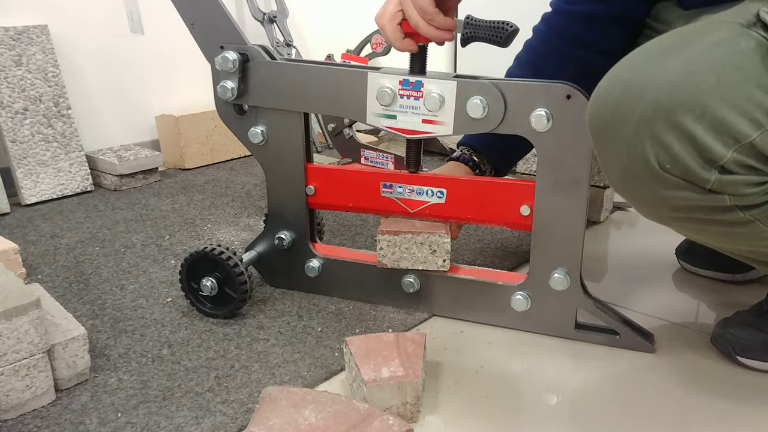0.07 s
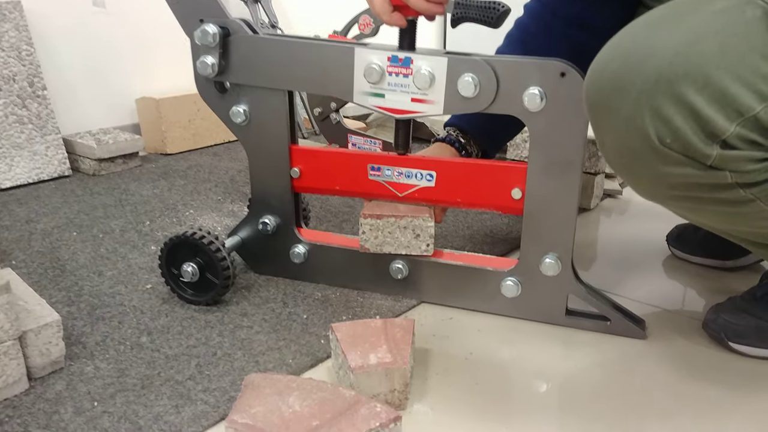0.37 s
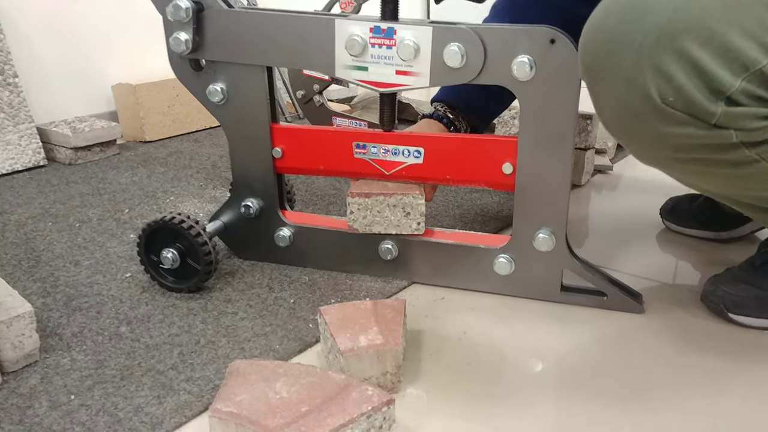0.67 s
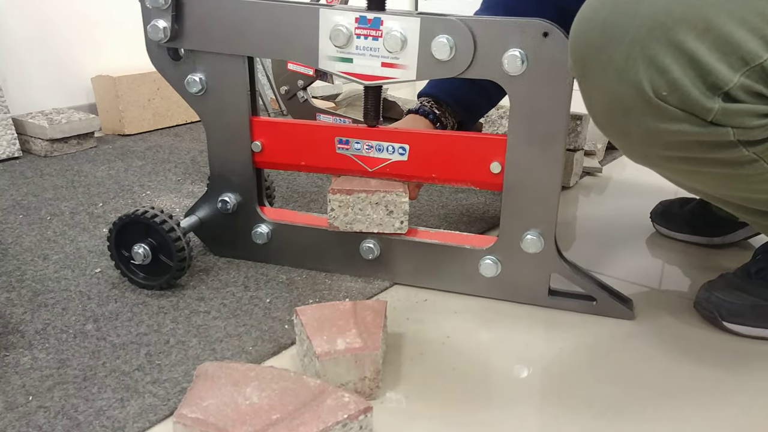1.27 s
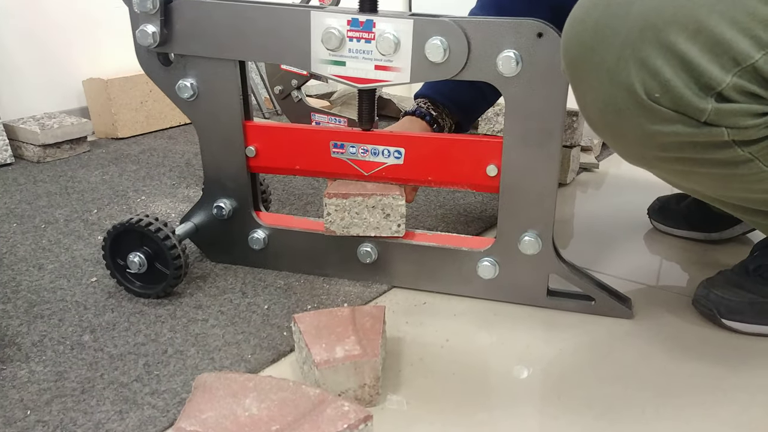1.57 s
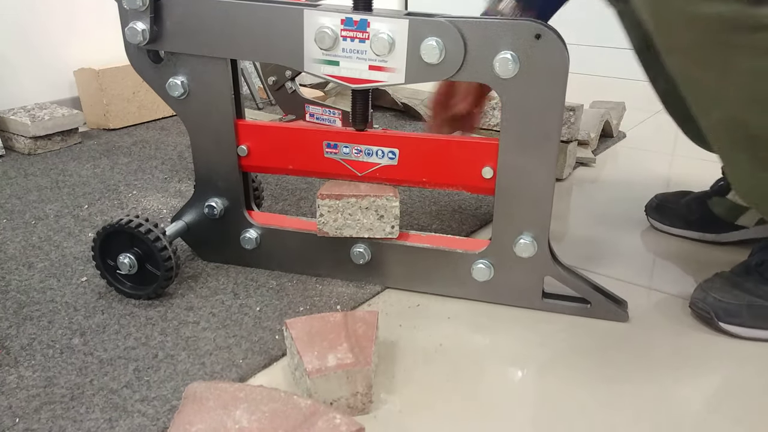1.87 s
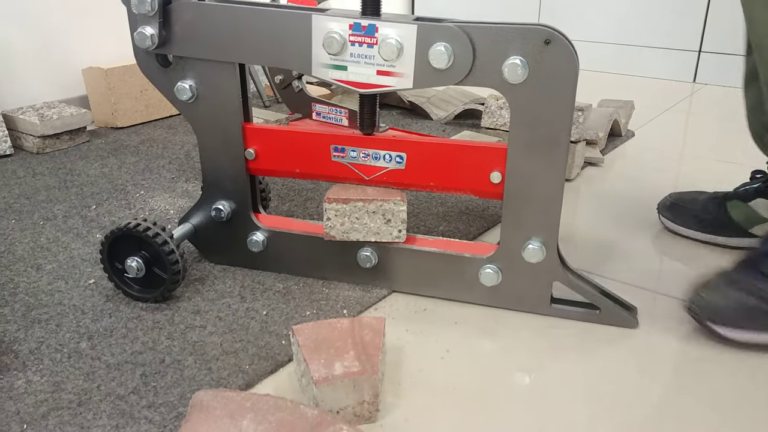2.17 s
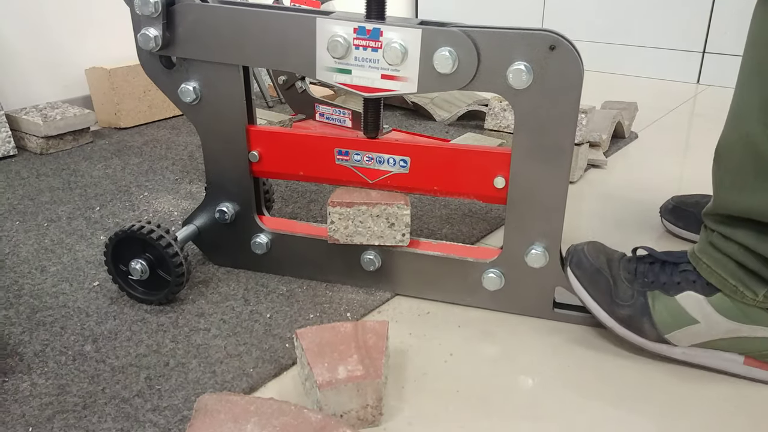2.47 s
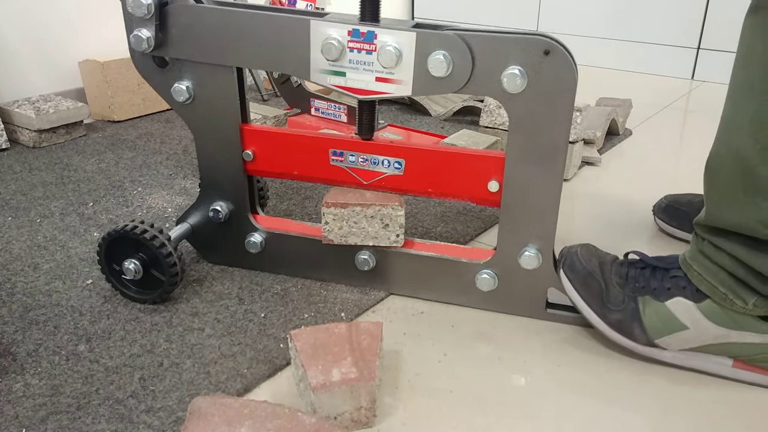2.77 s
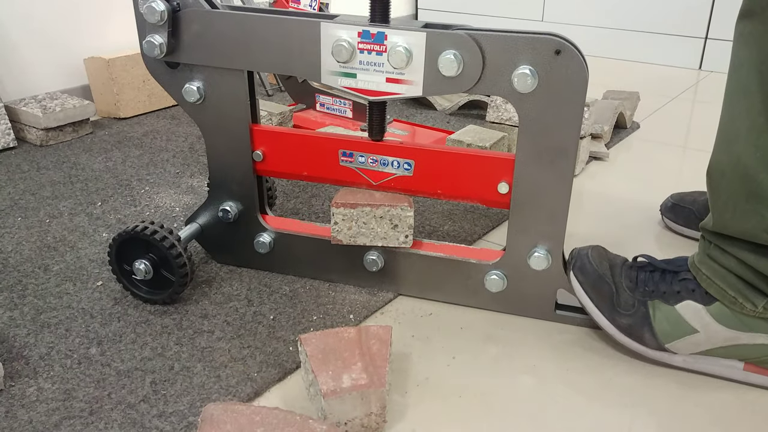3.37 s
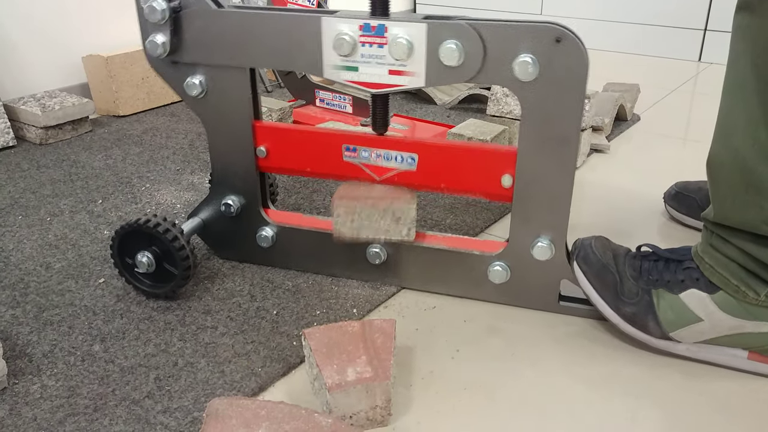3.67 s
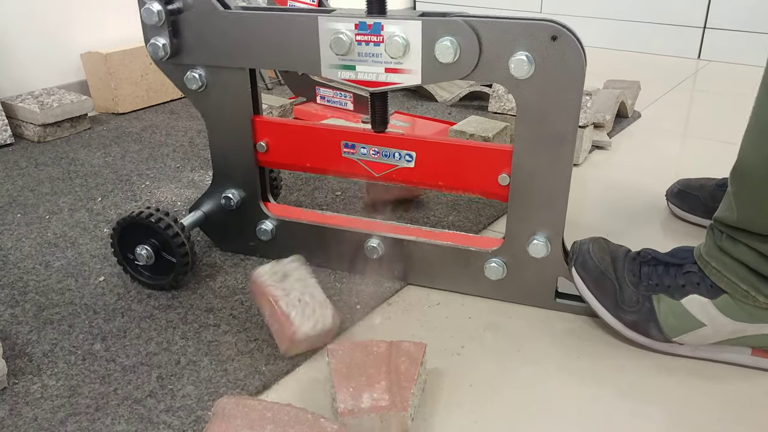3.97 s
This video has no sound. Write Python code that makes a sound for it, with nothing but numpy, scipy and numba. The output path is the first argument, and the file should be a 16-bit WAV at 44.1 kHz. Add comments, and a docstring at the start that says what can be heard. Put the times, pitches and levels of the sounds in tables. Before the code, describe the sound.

A paving block splits with a loud crack in a steel lever cutter. First come faint scraping, a shoe's stamp, creaking and crunching; then the halves clatter against the frame, close by in a hard-floored room.

```python
"""Cutting a paving block

A lever block cutter in a hard-floored showroom, about a metre from a stereo microphone, a little right.
The blade screw is turned, a block is slid into place and a shoe stamps on the frame's foot.
The lever creaks, the blade crunches in, the block snaps and its halves tumble against the steel.
The recorder's limiter flattens the bang."""
import sys
import numpy as np
from scipy import signal
from scipy.fft import rfft, irfft
from scipy.io import wavfile
from scipy.ndimage import uniform_filter1d
from numba import njit

SR = 44100
rng = np.random.default_rng(int(sys.argv[2]) if len(sys.argv) > 2 else 0)


def master_out(mix):
    """Clip the mix to full scale and print it as 16-bit PCM to the path in sys.argv[1]."""
    frames = np.transpose(np.atleast_2d(mix))
    ceiling = np.clip(frames, -1, 1)
    pcm = np.round(ceiling * 32767).astype(np.int16)
    wavfile.write(sys.argv[1], SR, pcm)


N = 176400
TIME = np.arange(N) / SR
WIDE_ABOVE_HZ, STEREO_WIDTH = 930, 0.83


# the break, the dropping blade and the tumbling halves:
# (time [s], stone crack [dB], its decay [s], clank [dB], floor thud [dB])
BLOWS = [(3.6613, 1, 0.061, -8, -20), (3.688, -1.5, 0.055, -1.5, -3.5), (3.729, -6, 0.0087, -6.5, -19),
         (3.743, -11.5, 0.014, -9, -3), (3.777, -8, 0.026, 5, -9.5), (3.803, -8.5, 0.01, -3, -20),
         (3.819, 10.5, 0.0026, 1.5, -9.5), (3.826, -19, 0.0046, -12, 3), (3.836, -9, 0.0015, -9, -11),
         (3.924, -34, 0.058, -26, -9.5)]
# tone of bursting stone and of struck steel: (frequency [Hz], gain [dB])
STONE_COLOUR = [(180, -17), (350, -3), (600, -8), (1200, -6.5), (2250, -1), (2600, -10.5), (3500, -4),
                (5500, -8.5), (7600, -10.5), (9000, -24), (11000, -41.5), (15000, -25)]
CLANK_COLOUR = [(80, -28), (160, -0.5), (330, 2), (500, -3.5), (900, 0), (1500, -5.5), (2200, -9.5),
                (4000, -25), (12000, -50)]
# ringing of the steel frame: (frequency [Hz], gain [dB])
FRAME_MODES = [(253, 7), (346, 3.5), (585, 2.5), (816, -1), (1150, -1), (1828, -2.5), (1934, -6),
               (2021, -3), (2292, -12), (2337, -4.5), (3603, -13.5), (4395, -14)]
# hollow pop of the parting block; boom of the frame on the floor: (frequency [Hz], width [Hz], gain [dB])
POP_MODES = [(1280, 250, 0)]
BOOM_MODES = [(67.4, 3.1, 4), (93.5, 6.3, 3.5), (114, 7.7, -2.5), (165, 17, -6.5), (253, 21, -3),
              (344, 33, -3.5)]

def snap(clank_s=0.012, thud_s=0.0017, pop_s=0.0013, ring_t60_s=0.3, ring_db=-22.5):
    """The block bursts; blade and halves strike the frame, which rings and booms on the floor."""
    bursts = sum(undb(db) * decay(s, length) for s, db, length, _, _ in BLOWS)
    stone = grit(per_s=870, spread_db=-0.5, grain_s=0.0052) * bursts
    strikes = [(s, db) for s, _, _, db, _ in BLOWS]
    clank = noise() * hits(strikes, clank_s)
    thuds = np.ones((2, 1)) * hits([(s, db) for s, _, _, _, db in BLOWS], thud_s)
    energy = sum((undb(db) * decay(s, ring_t60_s / np.log(1000))) ** 2 for s, db in strikes)
    ring = np.sqrt(energy) * sum(undb(db + ring_db) * beating(hz) for hz, db in FRAME_MODES)
    pop = resonate(noise() * undb(7) * decay(BLOWS[0][0], pop_s), POP_MODES)
    crack = pan(colour(stone, STONE_COLOUR), db=-1.3)
    boom = pan(resonate(thuds, BOOM_MODES), db=4)
    return crack + pop + colour(clank, CLANK_COLOUR) + ring + boom


# the blade crushing the block's surface: (time [s], level [dB])
CRUNCH = [(3.15, -55.5), (3.162, -39.5), (3.24, -31.5), (3.30, -33), (3.35, -41.5), (3.44, -54),
          (3.51, -36.5), (3.59, -45), (3.655, -39.5)]
# small fractures before the break: (time [s], level [dB], jolt [dB])
CRACKS = [(3.1567, -33.5, -66), (3.235, -16.5, -46), (3.3614, -10.5, -35), (3.4189, -16, -35),
          (3.4426, -14, -40), (3.472, -20.5, -71), (3.5278, -27, -67), (3.604, -25, -66),
          (3.654, -17.5, -72)]
# tone of the crushed grains: (frequency [Hz], gain [dB])
CRUNCH_COLOUR = [(100, -6.5), (800, -29), (1200, -13), (1500, -2.5), (2300, -7.5), (3100, -17), (3950, 3.5),
                 (4700, -3), (7400, -1), (8000, -13), (9200, -10.5), (10800, -43), (15500, -13)]
# ringing of the blade: (frequency [Hz], width [Hz], gain [dB])
BLADE_MODES = [(3993, 120, 6.5), (5520, 85, -1), (6330, 120, 2), (7260, 93, 4)]

def blade(crack_s=0.0042, jolt_s=0.021):
    """Grains crush under the edge and small fractures ring the blade and jolt the frame."""
    crush = grit(per_s=400, spread_db=4.5, grain_s=0.0031) * curve(CRUNCH)
    cracks = noise() * hits([(s, db) for s, db, _ in CRACKS], crack_s)
    ring = undb(-4.5) * resonate(cracks + undb(-7.5) * crush, BLADE_MODES)
    jolts = noise() * hits([(s, db) for s, _, db in CRACKS], jolt_s)
    thumps = resonate(jolts, [(133, 130, 5.8), (280, 170, 8)])
    return undb(-0.5) * colour(crush + cracks, CRUNCH_COLOUR) + ring + thumps


# creak of the lever under load: (time [s], level [dB])
CREAK = [(2.6, -62), (2.612, -44), (2.66, -39), (2.74, -39.5), (2.81, -30.5), (2.88, -39), (2.95, -34.5),
         (3.05, -47.5), (3.13, -53.5)]
# tone of the creak: (frequency [Hz], gain [dB])
CREAK_COLOUR = [(200, -5), (400, -18.5), (1000, -23), (1550, 1), (2000, -11), (2900, -8), (4400, 2),
                (5200, 0), (6100, -12), (7400, -14), (9200, -17.5), (10800, -66), (14500, -20)]
# slips of the lever joint: (time [s], level [dB], knock of the frame [dB])
SLIPS = [(2.61, -30.5, -34.5), (2.633, -49, -22.5), (2.648, -22, -23.5), (2.758, -25, -50),
         (2.7807, -24, -36), (2.798, -31.5, -29), (2.821, -25.5, -37), (2.832, -22.5, -42),
         (2.8603, -21, -47), (2.906, -16.5, -30.5), (2.9191, -3.5, -10.5), (3.102, -36.5, -54)]
# rasp of the joint, rising as the load builds: (time [s], level [dB], centre [Hz])
RASP = [(2.61, -50, 3600), (2.68, -42, 3780), (2.75, -45.5, 4250), (2.83, -39, 4600), (2.93, -41, 4700)]
# the joint's ring, its first squeak, the knock of lever and frame: (frequency [Hz], width [Hz], gain [dB])
JOINT_MODES = [(4450, 210, -0.5), (5180, 73, -2)]
SQUEAK_MODES = [(3920, 170, -5.5), (7090, 79, 2.5)]
KNOCK_MODES = [(1000, 1100, -39), (1507, 100, 3), (1837, 92, 2), (2266, 42, -6)]

def lever(slip_s=0.0029, knock_s=0.0078):
    """The loaded joint squeaks, rasps upward in small ringing slips and clacks as the blade seats."""
    friction = grit(per_s=300, spread_db=3, grain_s=0.0021)
    slips = noise() * hits([(s, db) for s, db, _ in SLIPS], slip_s)
    creak = undb(-3) * colour(friction * curve(CREAK) + slips, CREAK_COLOUR)
    ring = undb(-6.5) * resonate(slips, JOINT_MODES)
    squeak = resonate(friction * undb(-38.5) * decay(start=2.609, seconds=0.087), SQUEAK_MODES)
    rasp_level = curve([(s, db) for s, db, _ in RASP])
    rasp = glide(friction * rasp_level, [(s, hz) for s, _, hz in RASP], width_hz=160)
    knocks = noise() * hits([(s, db) for s, _, db in SLIPS], knock_s)
    return creak + ring + squeak + rasp + undb(-3.5) * resonate(knocks, KNOCK_MODES)


# footfalls beside the cutter: (time [s], level [dB], decay [s])
STEPS = [(2.267, -37.5, 0.018), (2.302, -27.5, 0.021), (2.416, -1, 0.014), (2.466, -12.5, 0.013),
         (2.613, -31.5, 0.033)]
# dull tone of the sole: (frequency [Hz], gain [dB])
STEP_COLOUR = [(25, -28), (60, 2.5), (170, -4), (340, -5), (600, -17), (900, -21), (1300, -31.5),
               (2400, -43), (4000, -47), (7500, -64), (12000, -90)]

def footfalls():
    """A rubber sole shuffles, then stamps the frame's foot onto the tiles."""
    impacts = sum(undb(db) * decay(s, length) for s, db, length in STEPS)
    return colour(noise() * impacts, STEP_COLOUR)


# the block rubbing over the steel bed, and catching on it: (time [s], level [dB])
SLIDE = [(1.287, -52), (1.34, -46), (1.36, -35.5), (1.385, -38), (1.42, -47), (1.48, -78)]
CATCHES = [(1.289, -44), (1.322, -38.5), (1.354, -31), (1.369, -27.5), (1.384, -29.5), (1.408, -36),
           (1.46, -47)]
# tone of the scrape: (frequency [Hz], gain [dB])
SLIDE_COLOUR = [(150, -16), (700, -17.5), (1500, 2), (3000, -8.5), (5500, -10), (8500, -17), (11000, -35),
                (14500, -20)]
# ringing under the scrape: (frequency [Hz], width [Hz], gain [dB])
SLIDE_MODES = [(1640, 80, -2), (4363, 55, 7), (4870, 50, -3), (5490, 130, 5.5), (6980, 65, -2.5),
               (7900, 88, -9)]

def slide(catch_s=0.0022):
    """The block chatters into place, stone rubbing and catching on steel."""
    catches = noise() * hits(CATCHES, catch_s)
    rub = grit(per_s=570, spread_db=-2, grain_s=0.0034) * curve(SLIDE)
    ring = resonate(catches + undb(-9) * rub, SLIDE_MODES)
    return undb(-3.5) * colour(rub + catches, SLIDE_COLOUR) + ring


# turns of the blade screw: (time [s], level [dB])
SCREW = [(0, -77), (.09, -50), (.17, -53), (.22, -86), (.26, -56), (.32, -55.5), (.38, -59.5), (.45, -104)]
# resonances of screw and beam: (frequency [Hz], width [Hz], gain [dB])
SCREW_MODES = [(86.7, 22, 1.5), (136, 39, 1), (364, 33, -6.5), (826, 56, -4), (1580, 127, -13.5)]

def screw():
    """The screw grinds round, sticking and slipping, and the beam resonates."""
    friction = grit(per_s=110, spread_db=-2.5, grain_s=0.0051) * curve(SCREW)
    return undb(4) * resonate(friction, SCREW_MODES)


# the block meeting the frame: (time [s], thump [dB], ring [dB])
NUDGES = [(0.92, -46, -70), (1.011, -51, -53.5)]
# ringing after a nudge: (frequency [Hz], width [Hz], gain [dB])
NUDGE_MODES = [(1037, 29, -2), (1750, 19, 6)]

def nudges(decay_s=0.018):
    """The block bumps softly against the frame: a low thump and a faint ring."""
    thumps = noise() * hits([(s, db) for s, db, _ in NUDGES], decay_s)
    taps = noise() * hits([(s, db) for s, _, db in NUDGES], decay_s)
    return resonate(thumps, [(86, 14, 7), (170, 190, -4)]) + resonate(taps, NUDGE_MODES)


# the worker getting up: (time [s], level [dB])
RUSTLE = [(1.5, -77), (1.78, -72.5), (1.87, -59.5), (1.97, -59.5), (2.06, -72), (2.1, -55), (2.14, -72.5),
          (2.6, -68.5)]
# tone of the cloth: (frequency [Hz], gain [dB])
RUSTLE_COLOUR = [(150, -9), (350, -3.5), (900, -7.5), (2800, -13), (5000, -3), (8000, -10), (11000, -39)]

def clothes():
    """Cloth rustles, with one light tick of grit on the steel."""
    cloth = grit(per_s=280, spread_db=2, grain_s=0.0045) * curve(RUSTLE)
    tick = noise() * undb(-40) * decay(start=1.8492, seconds=0.0029)
    return colour(cloth + tick, RUSTLE_COLOUR)


# light rubs of hand, sleeve and shoe: (time [s], half length [s], level [dB], centre [Hz])
BRUSHES = [(.315, 0.016, -66, 5140), (0.563, 0.16, -76, 7540), (2.321, 0.016, -65.5, 6000)]

def brushes(relative_width=0.33):
    """Light rubs swell and fade, each a narrow hiss."""
    rubs = 0
    for s, length, db, hz in BRUSHES:
        band = [(hz, hz * relative_width, 0)]
        hiss = resonate(resonate(noise(), band), band)
        rubs += hiss * undb(db) * np.exp(-((TIME - s) / length) ** 2)
    return rubs


# reverberation of the showroom: (frequency [Hz], time to fall 60 dB [s])
ROOM_T60 = [(80, 1), (300, 0.68), (1000, 0.36), (4000, 0.24), (8000, 0.25), (16000, 0.24)]

def room(x, wet_db, delay_s=0.0046, size=44100):
    """Echoes from tiles and walls reach the microphone after the direct sound; the treble dies first."""
    hz, t, cells = signal.stft(noise()[:, :size], SR, nperseg=256)
    band_hz, band_t60 = np.array(ROOM_T60).T
    t60 = np.interp(np.log(hz + 1), np.log(band_hz), band_t60)
    tail = signal.istft(cells * undb(-60 * t / t60[:, None]), SR)[1][:, :size]
    onset = np.clip(TIME[:size] / delay_s - 1, 0, 1)
    return x + undb(wet_db) * through(x, tail * onset)


# room tone at the microphone: (frequency [Hz], gain [dB])
AIR_COLOUR = [(20, -35.5), (45, -6), (80, 11.5), (170, -1.5), (300, -9.5), (1500, -17), (4200, -23.5),
              (7700, -24.5), (10000, -39.5), (16000, -25)]

def air():
    """A faint, steady rumble of air."""
    return pan(undb(-60) * colour(noise(), AIR_COLOUR), db=-4.5)


def undb(db):
    """Decibels to gain."""
    return 10 ** (np.asarray(db) / 20)


def curve(rows):
    """Gain along (time [s], level [dB]) points, silent outside them."""
    return undb(np.interp(TIME, *np.array(rows).T, left=-140, right=-140))


def decay(start, seconds):
    """A sudden rise that dies away."""
    return (TIME >= start) * np.exp(-np.clip((TIME - start) / seconds, 0, 60))


def hits(rows, decay_s):
    """Envelope of impacts at (time [s], level [dB]) points."""
    return sum(undb(db) * decay(s, decay_s) for s, db in rows)


def noise():
    """Stereo noise, alike in the bass and wide in the treble."""
    mid, side = rng.standard_normal((2, N))
    side = STEREO_WIDTH * signal.lfilter(*signal.butter(1, WIDE_ABOVE_HZ, "high", fs=SR), side)
    return np.array([mid + side, mid - side]) / np.sqrt(2)


def grit(per_s, spread_db, grain_s):
    """Stick-slip: short bursts of noise at uneven intervals and of uneven size."""
    gaps, sizes = rng.random((8000, 2)).T
    at = (np.cumsum(.25 + 1.5 * gaps) / per_s * SR).astype(int)
    kicks = np.zeros(N)
    kicks[at[at < N]] = undb(-spread_db * np.log(.03 + sizes[at < N]))
    swell = signal.lfilter([1], [1, -np.exp(-1 / (grain_s * SR))], kicks)
    return noise() * swell / np.sqrt(np.mean(swell ** 2))


def beating(hz, max_beat_hz=18):
    """A close pair of modes; higher pairs differ more in phase between left and right."""
    apart = min(1, hz / WIDE_ABOVE_HZ) ** 2
    pair = hz, hz + max_beat_hz * rng.uniform(-1, 1)
    cycles = [f * TIME + rng.random() + apart * rng.random((2, 1)) for f in pair]
    return sum(np.sin(2 * np.pi * c) for c in cycles) / np.sqrt(2)


def pan(x, db):
    """Place a sound left (+) or right (-)."""
    return x * undb(np.array([[db], [-db]]) / 2)


def through(x, response):
    """Pass a sound through a response scaled to unit energy."""
    response = np.atleast_2d(response)
    energy = np.sum(response ** 2) / len(response)
    return signal.oaconvolve(x, response / np.sqrt(energy), axes=1)[:, :N]


def colour(x, points, size=8192):
    """Minimum-phase filter along (frequency [Hz], relative gain [dB]) points."""
    hz, db = np.array(points).T
    bin_hz = np.arange(size // 2 + 1) * SR / size
    log_gain = np.log(undb(np.interp(np.log(bin_hz + 1), np.log(hz), db)))
    cepstrum = irfft(log_gain)
    cepstrum[1:size // 2] *= 2
    cepstrum[size // 2 + 1:] = 0
    return through(x, irfft(np.exp(rfft(cepstrum))))


def resonate(x, modes, size=12000):
    """A body with (frequency [Hz], width [Hz], relative gain [dB]) resonances."""
    t = TIME[:size]
    return through(x, sum(undb(db) * width * np.exp(-np.pi * width * t) * np.sin(2 * np.pi * hz * t)
                          for hz, width, db in modes))


def glide(x, rows, width_hz):
    """One resonance whose centre follows (time [s], frequency [Hz]) points."""
    turn = np.exp(2j * np.pi * np.cumsum(np.interp(TIME, *np.array(rows).T)) / SR)
    keep = np.exp(-np.pi * width_hz / SR)
    return np.real(turn * signal.lfilter([np.sqrt(2 * (1 - keep ** 2))], [1, -keep], x / turn))


@njit
def follow(peaks, keep):
    """Peak follower: instant rise, slow fall."""
    out, held = np.empty(len(peaks)), 0.
    for i in range(len(peaks)):
        held = max(peaks[i], held * keep)
        out[i] = held
    return out


def scene(cutter_pan_db=-5.5):
    """The work a metre off and right of the microphone, with the showroom's echo and room tone."""
    setting_up = screw() + nudges() + slide() + clothes() + brushes()
    work = pan(setting_up + lever() + blade(), cutter_pan_db)
    return (air() + room(work, wet_db=-8)
            + room(pan(footfalls(), cutter_pan_db), wet_db=-9.5)
            + room(snap(), wet_db=-10))


def record(dry, low_cut_hz=52, top_hz=16000, release_s=0.037):
    """A fast limiter holds the bang at full scale; the deepest bass and the top are cut."""
    dry = signal.sosfilt(signal.butter(4, low_cut_hz, "high", fs=SR, output="sos"), dry)
    held = follow(np.abs(dry).max(axis=0), np.exp(-1 / (release_s * SR)))
    gain = uniform_filter1d(np.minimum(1, 1 / (held + 1e-9)), size=45)
    limited = np.clip(dry * gain, -1, 1)
    return signal.sosfilt(signal.ellip(8, .2, 70, top_hz, fs=SR, output="sos"), limited)


dry = scene()
out = record(dry)
master_out(out)
```